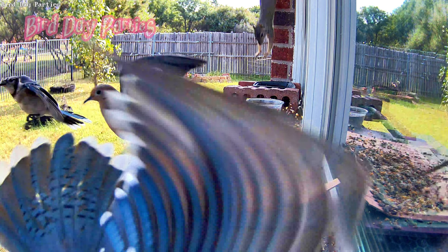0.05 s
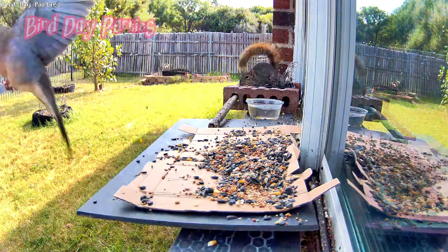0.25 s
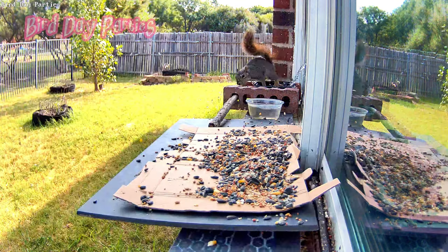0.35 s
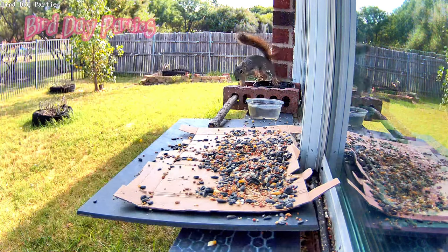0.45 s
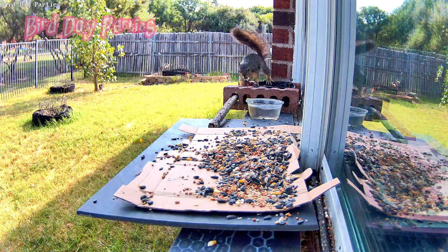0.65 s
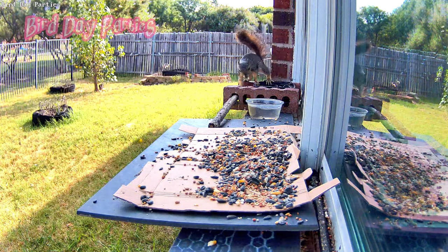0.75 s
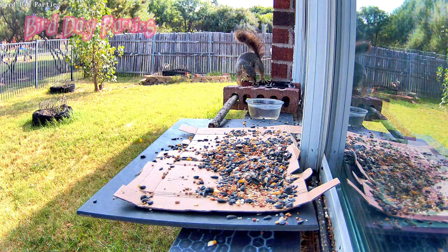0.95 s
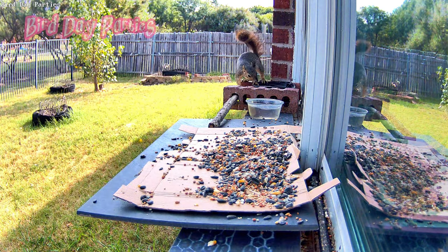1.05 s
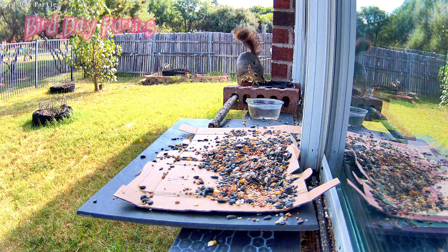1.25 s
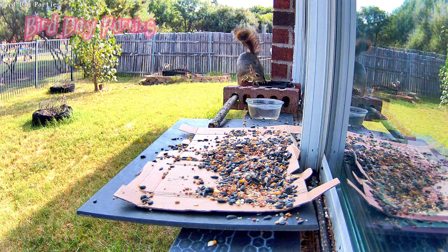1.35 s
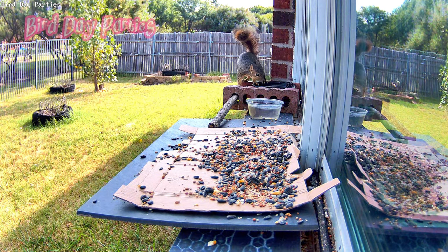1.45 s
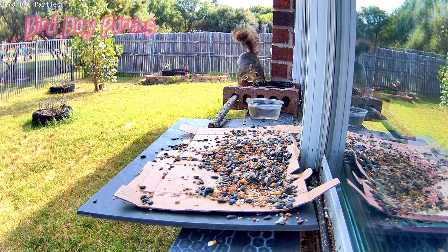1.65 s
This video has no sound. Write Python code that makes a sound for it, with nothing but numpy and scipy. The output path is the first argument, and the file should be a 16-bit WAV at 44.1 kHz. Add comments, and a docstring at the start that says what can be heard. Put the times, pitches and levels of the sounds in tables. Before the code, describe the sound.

A dove bursts into flight close by, wings flapping and whistling away.

```python
"""In a quiet back yard, a dove bursts off a feeder right beside a small microphone.
Its feathers rustle, its wings clap once, and their gusts of air overload the microphone.
It flies away, trailing stirred air, and its fluttering feathers whistle on every wingbeat.
A jay gives one harsh call from across the yard."""
import sys
import numpy as np
from scipy import signal
from scipy.fft import rfft, irfft
from scipy.io import wavfile
from scipy.ndimage import uniform_filter1d

SR = 44100
rng = np.random.default_rng(int(sys.argv[2]) if len(sys.argv) > 2 else 0)


def log_audio(samples):
    """Write samples as a 16-bit WAV file to the path given in sys.argv[1]."""
    # one column per channel
    frames = np.atleast_2d(samples).T
    # limit to full scale, then quantise
    limited = np.clip(frames, -1, 1)
    pcm = np.round(limited * 32767).astype(np.int16)
    wavfile.write(sys.argv[1], SR, pcm)


N = 74970
T = np.arange(N) / SR


def undb(db):
    """Turn decibels into a factor to multiply by."""
    return 10 ** (np.asarray(db) / 20)


def unit(x):
    """Scale a signal to an average strength (rms) of 1."""
    return x / np.sqrt(np.mean(x ** 2))


def colour(x, points):
    """Turn frequencies up or down along a curve of (f/Hz, level/dB) points."""
    hz, db = np.array(points, float).T
    f = np.maximum(np.arange(N + 1) * SR / (2 * N), 1)
    gain = undb(np.interp(np.log(f), np.log(hz), db))
    return irfft(rfft(x, 2 * N) * gain)[:N]


def noise(points):
    """Noise of strength 1 with the given tone colour."""
    return unit(colour(rng.standard_normal(N), points))


def wander(rate):
    """A smooth random wobble of strength 1 that changes about `rate` times a second."""
    width = max(int(SR / rate), 1)
    smoothed = uniform_filter1d(rng.standard_normal(N), width, mode="wrap")
    return unit(uniform_filter1d(smoothed, width, mode="wrap"))


def yard():
    """Soft outdoor noise with two faint tones, a low swell and a thin, far hiss that starts late."""
    # tone colours of the background, the swell and the hiss: f/Hz, level/dB
    background_colour = [(40, -3), (120, 4.5), (300, -8.5), (600, -8.5), (1000, -14), (2000, -11.5),
                         (3500, -24.5), (4500, -8.5), (5500, -63.5), (7500, -43), (9000, -67)]
    swell_colour = [(100, -18.5), (170, -5), (330, 1), (550, -1.5), (900, -35), (4000, -27)]
    hiss_colour = [(5000, -14), (6700, -6), (7300, 9), (7900, -9), (8500, -10), (9000, -17)]
    # faint steady tones: f/Hz, level/dB
    tones = [(690, -64), (4497, -67)]
    swell_at_s, swell_width_s, hiss_start_s = 1.505, .072, 1.61
    swell = undb(-52) * np.exp(-((T - swell_at_s) / swell_width_s) ** 2) * noise(swell_colour)
    hiss = undb(-49.5) * np.clip((T - hiss_start_s) / .0072, 0, 1) * noise(hiss_colour)
    hum = sum(undb(db) * np.sqrt(2) * np.sin(2 * np.pi * hz * T) for hz, db in tones)
    return undb(-53 + wander(4.6)) * noise(background_colour) + swell + hiss + hum


def rustle():
    """Feather rubs on feather in thousands of tiny ticks; gives a lower part (body) and a treble part."""
    # tone colours of the two parts: f/Hz, level/dB
    body_colour = [(100, 9), (300, -6.5), (500, -7), (700, -0.5), (1100, -0.5), (1900, 1), (2600, -5.5),
                   (4000, -18), (9000, -67.5)]
    treble_colour = [(1200, -27.5), (2200, -5.5), (3000, 4.5), (4300, 4.5), (5000, 3.5), (6600, 6),
                     (7300, 9.5), (7900, -2.5), (8800, -14)]
    ticks_per_s, scatter_db, flicker_db = 9000, 2.2, 2.2
    ticks = (rng.random(N) < ticks_per_s / SR) * rng.choice([-1, 1], N)
    ticks = ticks * undb(scatter_db * np.minimum(rng.exponential(size=N), 4))
    ticks *= undb(flicker_db * wander(220))
    return unit(colour(ticks, body_colour)), unit(colour(ticks, treble_colour))


def stirred_air():
    """Stirred air buffets the microphone and feathers hiss, both fading as the bird leaves."""
    # rise and fall of the two sounds: t/s, air level/dB, relative hiss level/dB
    levels = [(.19, -49.5, -33), (.25, -28, -36), (.30, -22.5, -31), (.45, -20, -54), (.53, -20.5, -44.5),
              (.60, -16, -45), (.64, -17.5, -48), (.74, -19.5, -45), (.81, -15, -45), (.89, -24.5, -53.5),
              (1.0, -29.5, -55.5), (1.11, -24.5, -59.5), (1.2, -36.5, -59), (1.29, -29, -104),
              (1.42, -32.5, -59), (1.7, -31.5, -74)]
    # tone colour of the rumbling air: f/Hz, level/dB
    air_colour = [(20, 7.5), (45, -1.5), (85, -7), (130, -17), (250, -28.5), (500, -38.5), (1500, -65.5),
                  (8000, -77.5)]
    at, air_db, hiss_db = np.array(levels).T
    body, treble = rustle()
    rumble = undb(np.interp(T, at, air_db)) * noise(air_colour)
    hiss = undb(np.interp(T, at, hiss_db)) * (body + undb(2.5) * treble)
    flicker = undb(-2 + 2 * wander(27))
    return rumble + hiss * flicker


def feathers():
    """Each stroke of the feathers is a burst of rustle that starts fast, holds and dies away."""
    # feather strokes: t/s, length/s, level/dB, treble compared with body/dB
    strokes = [(0.195, 0.036, -33, -6.5), (0.224, 0.021, -27, 4), (0.25, 0.015, -21.5, -1),
               (.274, 0.013, -22, 0), (0.29, 0.014, -17.5, 0), (0.3176, 0.0021, -28.5, 3.5),
               (0.327, 0.042, -28.5, -4.5), (0.366, 0.017, -25.5, -1), (0.381, 0.032, -25.5, -28),
               (0.397, .011, -17, -30), (0.419, 0.0099, -21, -16), (0.4418, 0.013, -29, -14.5),
               (0.4627, 0.00533, -26, -11), (0.468, 0.025, -29, -28), (0.497, 0.031, -40, -37),
               (0.522, 0.0052, -36, -8), (.541, 0.0069, -35, -1.5), (0.595, 0.027, -39, -4.5),
               (.706, 0.031, -37, -8), (0.784, 0.024, -39, -40)]
    rise_s, fade_s = .002, .004
    body, treble = rustle()
    out = np.zeros(N)
    for start, length, db, treble_db in strokes:
        rise = np.clip((T - start) / rise_s, 0, 1)
        fade = np.exp(-np.maximum(T - start - length, 0) / fade_s)
        out += undb(db) * rise * fade * (body + undb(treble_db) * treble)
    return out


def echo(x):
    """Sound scatters back from the house wall and the fence."""
    delay_s, fade_60_db_s = .0088, .083
    tail = rng.standard_normal(N) * np.exp(-np.log(1000) * T / fade_60_db_s) * (T > delay_s)
    return signal.fftconvolve(x, tail / np.linalg.norm(tail))[:N]


def gusts():
    """A passing wing pushes air at the microphone, then quickly swings to pulling it back."""
    # close wingbeats: t/s, push length/s, swing time/s, pull length/s, pressure level/dB
    beats = [(.277, .015, .003, .008, -7.5), (.290, .0035, .001, .023, -4), (.330, .006, .003, .005, -13),
             (.357, .019, .005, .027, -3), (.4235, .0145, .005, .020, -.5)]
    edge_s = .002
    out = np.zeros(N)
    for at, push, swing, pull, db in beats:
        passing = (np.tanh((T - at + push) / edge_s) - np.tanh((T - at - pull) / edge_s)) / 2
        out += undb(db) * passing * np.tanh((at - T) / swing)
    return out


def wing_clap():
    """The wings meet and the air between them rings briefly."""
    # two touches, so close that they sound like one clap: t/s, level/dB
    touches = [(0.4002, -0.5), (0.4054, -7.5)]
    # tones of the ringing air: f/Hz, level/dB, time to fade by 60 dB/s
    tones = [(930, -5.5, 0.024), (1042, 7, 0.013), (1507, -3, 0.011), (2040, -22, .01)]
    contact_s = .00088
    out = np.zeros(N)
    for at, db in touches:
        age = np.maximum(T - at, 0)
        ring = sum(undb(tone_db) * np.sin(2 * np.pi * hz * age) * np.exp(-np.log(1000) * age / fade_s)
                   for hz, tone_db, fade_s in tones)
        out += undb(db) * ring * (1 - np.exp(-age / contact_s))
    return out


def wing_whistles():
    """On each beat the feathers flutter in a raspy whistle that rises and falls, and air swishes past."""
    # wingbeats: t/s, length/s, top pitch/Hz, level/dB, first overtone/dB, whoosh/dB, roughness (0-1)
    beats = [(0.479, 0.025, 2100, -33, -5, -9.5, 0.7), (.554, 0.035, 2056, -29.5, -9, -13, 0.8),
             (0.652, .035, 2095, -31, -10, -9, 1), (0.742, .037, 2068, -29, -7.5, -3, 0.74),
             (.835, 0.0093, 2076, -30.5, -2.5, -10, .7), (.853, 0.025, 2055, -33, -11, -12.5, .8),
             (0.934, .037, 2080, -34.5, -4, -19.5, 0.74), (1.033, .038, 2060, -38, -7.5, -14.5, 0.9),
             (1.138, 0.034, 2017, -37, -16.5, -15, .25), (1.242, 0.029, 2052, -39, -22.5, -22.5, 0.17),
             (1.353, 0.029, 2007, -41.5, -23, -17.5, 0.16), (1.472, 0.028, 2025, -43.5, -5.5, -10, 0.4),
             (1.594, 0.023, 2043, -49, -25, -4, 0.1)]
    # tone colour of the low whoosh: f/Hz, level/dB
    whoosh_colour = [(80, 6), (200, 1), (420, 0), (650, -8.5), (1500, -50.5), (8000, -70.5)]
    rise_s, fade_s, overtone_step_db = .003, .013, -6
    peak_share, bend_per_s2 = .38, 200  # where in the beat the pitch peaks, how fast it bends away
    wing_drops_hz, wing_gains = (0, 100), (1, undb(-8))  # the second wing is lower and softer
    body, treble = rustle()
    swish = undb(-14) * body + undb(-15.5) * treble
    whoosh = noise(whoosh_colour)
    wobbles = [.022 * wander(240) + .028 * wander(1500) for _ in range(2)]  # waver plus rasp, per wing
    flutter_db = 2.8 * wander(170)
    out = np.zeros(N)
    for start, length, hz, db, overtone_db, whoosh_db, rough in beats:
        age = T - start
        loudness = np.clip(age / rise_s, 0, 1) * np.clip((length - age) / fade_s + .5, 0, 1)
        on = loudness > 0
        pitch = hz * (1 - bend_per_s2 * (age[on] - peak_share * length) ** 2)
        sound = rough * swish[on] + undb(whoosh_db) * whoosh[on]
        for wobble, drop_hz, gain in zip(wobbles, wing_drops_hz, wing_gains):
            phase = 2 * np.pi * np.cumsum(pitch * (1 + rough * wobble[on]) - drop_hz) / SR
            overtones = sum(undb(overtone_db + overtone_step_db * k) * np.sin((k + 2) * phase)
                            for k in range(2))
            sound += np.sqrt(2) * gain * undb(rough * flutter_db[on]) * (np.sin(phase) + overtones)
        out[on] += undb(db) * loudness[on] * sound
    return out


def jay():
    """One harsh call that rises and falls: two rough voices close in pitch, blurred by the yard's echo."""
    # course of the call: t/s, f/Hz, level/dB
    course = [(0.872, 563, -53), (.91, 600, -41), (0.944, 630, -43.5), (0.979, 655, -46),
              (1.004, 665, -42.5), (1.038, 639.3, -40.5), (1.075, 603, -44), (1.109, 570, -61)]
    # harmonics (tones at 1, 2, 3... times the pitch): relative level/dB
    harmonics = [-35, -5, -3, 0, -2, -1, -9, -22, -16, -14, -17, -19]
    roughness, flicker_db = .02, 4
    at, hz, db = np.array(course).T
    voices = np.zeros(N)
    for pitch_ratio, gain in ((1, 1), (.93, undb(-8))):
        pitch = pitch_ratio * np.interp(T, at, hz) * (1 + roughness * wander(600))
        phase = 2 * np.pi * np.cumsum(pitch) / SR
        for k, harmonic_db in enumerate(harmonics, 1):
            voices += gain * undb(harmonic_db + flicker_db * wander(87)) * np.sin(k * phase)
    call = unit(voices) * np.interp(T, at, undb(db), left=0, right=0)
    return call + undb(-3) * echo(call)


def scene():
    """The dove takes off and flies away, with the jay and the yard behind it."""
    wings = feathers() + wing_whistles()
    dove = wings + undb(-15.5) * echo(wings) + wing_clap() + gusts() + stirred_air()
    return (dove + jay() + yard())[None]


def record(dry):
    """Strong gusts overload the microphone and choke other sounds; deep bass and high treble are cut."""
    # tone colour of the microphone: f/Hz, level/dB
    mic_colour = [(6, -21.5), (15, -8.5), (30, -6), (100, -1.5), (400, 2), (1000, -1.5), (9000, -7.5)]
    overload, sharpness, leak = .44, 5, .06  # leak: the share of sound that escapes squashing
    silent_until_s, top_hz = .19, 8800
    pressure = dry[0]
    squashed = pressure / (1 + np.abs(pressure / overload) ** sharpness) ** (1 / sharpness)
    sound = colour(squashed + leak * (pressure - squashed), mic_colour)
    sound *= np.clip((T - silent_until_s) / .0024, 0, 1)
    low_pass = signal.ellip(10, .2, 80, top_hz, fs=SR, output="sos")
    return signal.sosfilt(low_pass, sound)[None]


dry = scene()
out = record(dry)
log_audio(out)
```